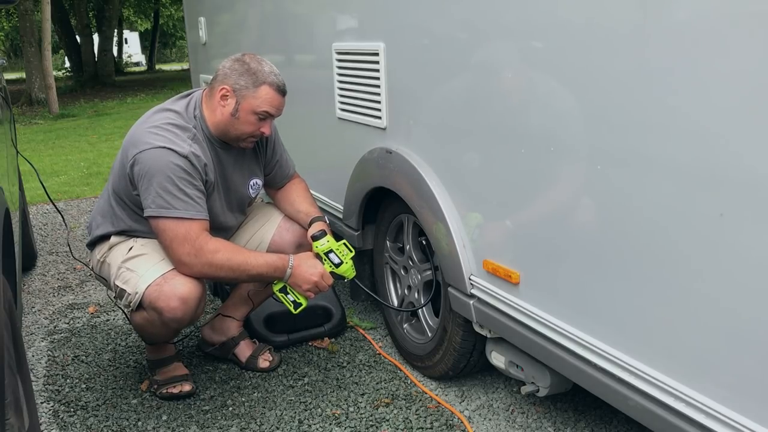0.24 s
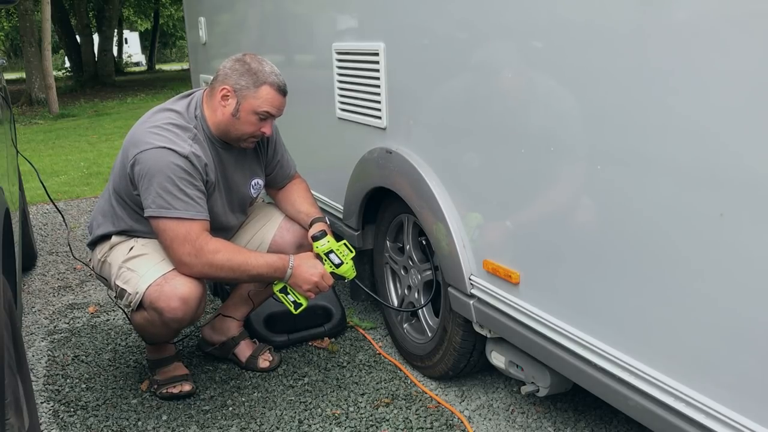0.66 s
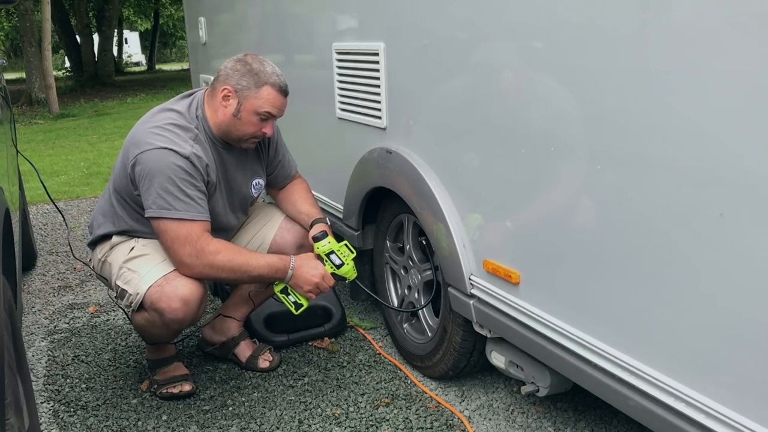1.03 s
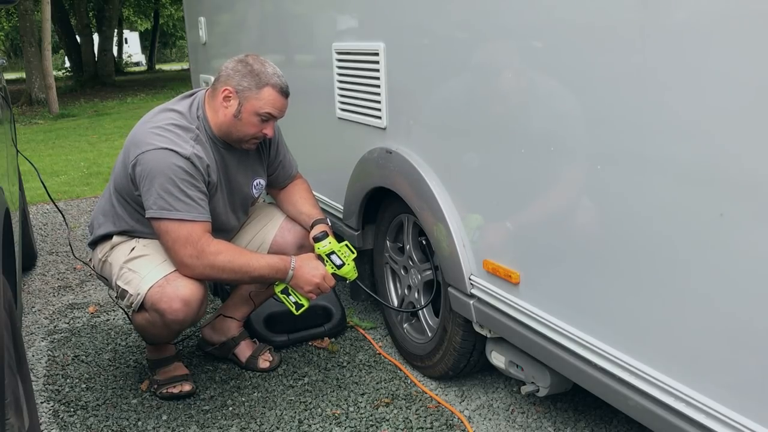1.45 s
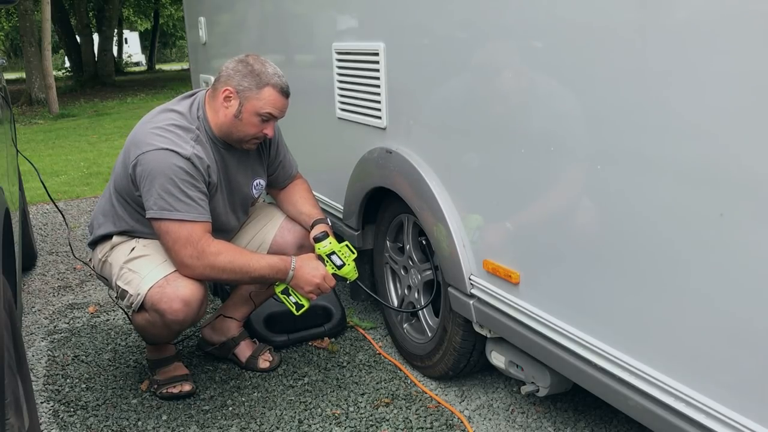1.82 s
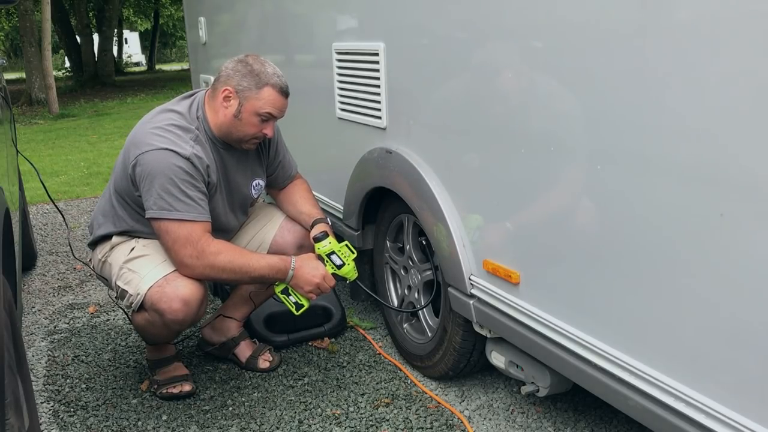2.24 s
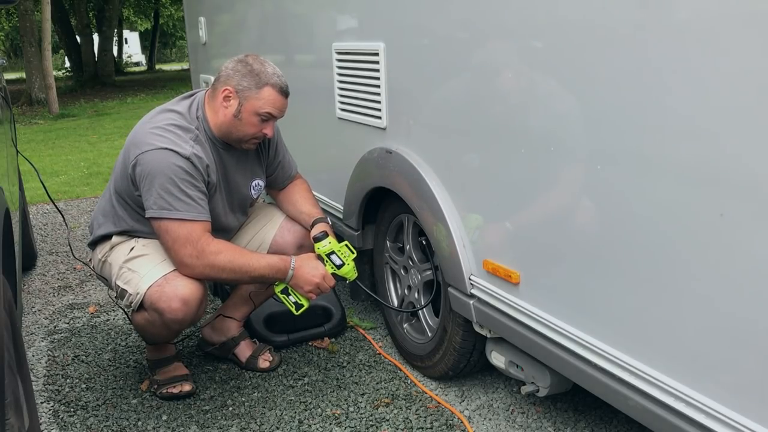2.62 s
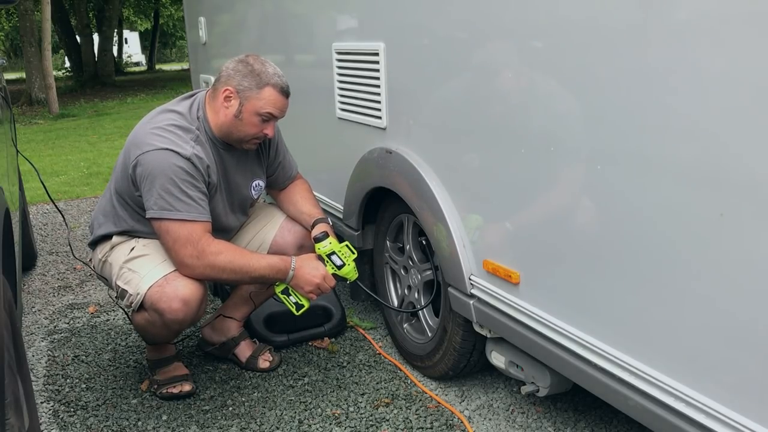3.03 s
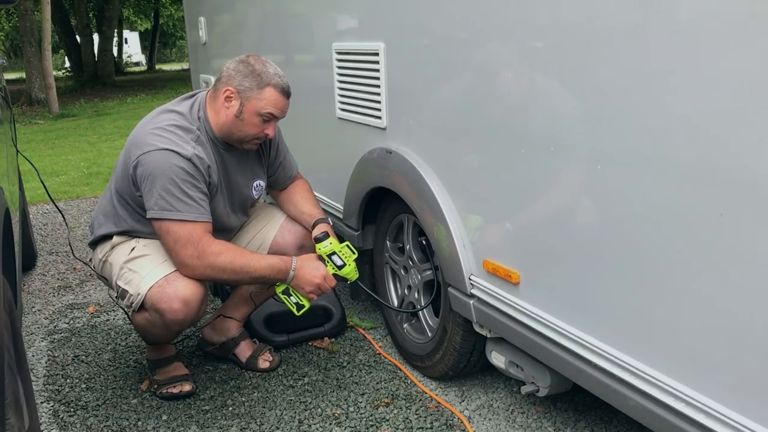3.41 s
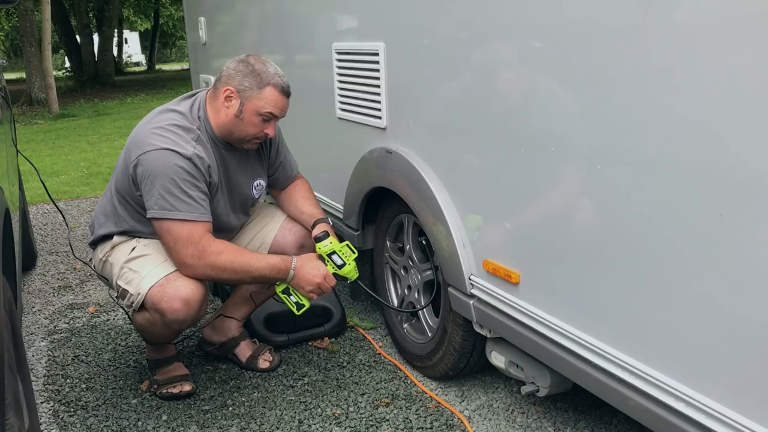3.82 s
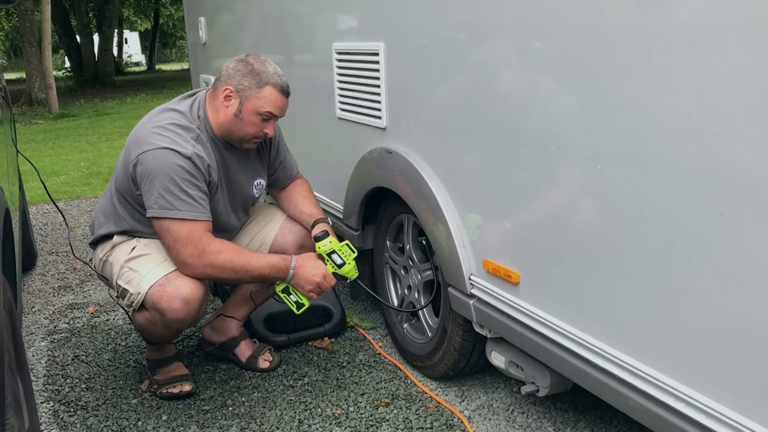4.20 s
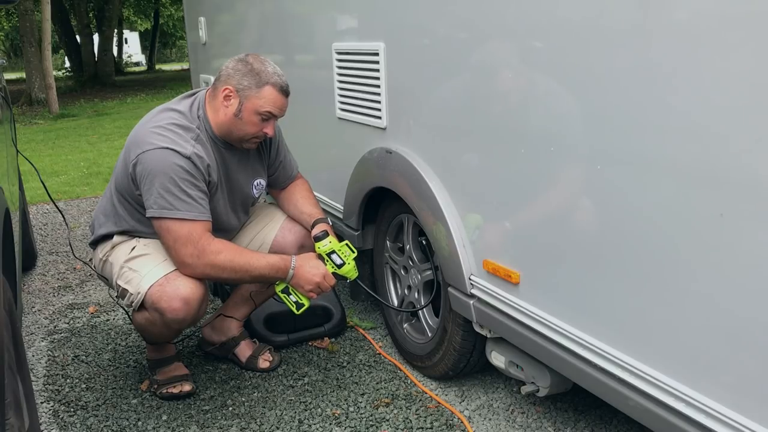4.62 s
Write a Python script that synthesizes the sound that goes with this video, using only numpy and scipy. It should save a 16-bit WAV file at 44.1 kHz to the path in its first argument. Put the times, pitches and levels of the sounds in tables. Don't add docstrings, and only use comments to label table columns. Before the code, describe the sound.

A small handheld air compressor drones steadily close to the microphone, a harsh buzzing rattle with a whining gear tone, outdoors.

```python
import sys
import numpy as np
from scipy import signal
from scipy.fft import rfft, irfft, next_fast_len
from scipy.io import wavfile
from scipy.ndimage import map_coordinates

SR = 44100
rng = np.random.default_rng(int(sys.argv[2]) if len(sys.argv) > 2 else 0)


def how_loud(loudness_db):
    steps = np.asarray(loudness_db, float) / 20
    return 10 ** steps


def unload_wav(signal):
    wavfile.write(
        sys.argv[1],
        SR,
        np.round(np.clip(np.atleast_2d(signal).T, -1, 1) * 32767).astype(np.int16),
    )


N = 209739

# t/s, speed/(turns per s)
CRANK_SPEED = [(0.0, 39.78), (0.38, 40.018), (0.52, 39.79), (0.93, 39.796), (1.15, 39.418), (1.19, 39.454),
               (1.28, 39.928), (2.35, 39.508), (2.55, 39.611), (3.2, 39.376), (3.4, 39.453), (3.68, 39.089),
               (3.91, 39.496), (4.27, 39.463), (4.35, 39.1), (4.39, 39.518), (4.47, 39.789),
               (4.756, 39.832)]
# t/s, gear load/dB, handle mode/dB (falls as the grip tightens), turn of the tool/(-1 to 1)
SLOW_DRIFT = [
    (0, -3.5, 5, 0.61),
    (.6, -2.5, 2.5, 0.43),
    (1.2, -1.5, 1.5, 0.2),
    (1.8, -0.5, -0.5, 0.037),
    (2.5, -0.5, 0.5, -.05),
    (3.2, 0, -2, -0.2),
    (4, .5, 0, -0.2),
    (4.76, 1, -3.5, -0.18),
]
# f/Hz, level/dB per Hz
OUTDOORS = [(22, 2), (50, 9.5), (90, -1), (150, 0), (280, -7.5), (600, 0), (1200, -5), (1800, -19)]
# f/Hz, level/dB per Hz
HISS = [(1000, -32), (1280, -1), (1890, -8), (2120, -21), (2610, -3), (5000, -7.5), (12000, -19),
        (14200, -34)]
# f/Hz, share/(0 to 1)
FRESH_SHARE = [(1400, 1), (1600, .35), (2130, .6), (2400, .25), (6000, .4), (10000, .4), (13000, .8),
               (14200, .92)]
# f/Hz, width/Hz, level/dB, loudest/turn, swell/dB, sharpness/1
HOUSING = [(478, 160, -77, 0.22, -26.5, 1.7), (944, 310, -46.5, 0.13, 5, 1.8),
           (1227, 310, -58.5, 0.58, 7.5, 5.8), (1627, 31, -45.5, 0.061, -1, 2),
           (1803, 270, -50, 0.81, 5.5, 1.7), (2146, 250, -45, 0.9, 7, 3), (2420, 100, -45.5, 0.36, -2, 10),
           (2764, 170, -53, 0.13, -2, 2.4), (2951, 82, -54, 0.69, 15, 2), (3470, 370, -51.5, 0.1, 10, 5.2),
           (3768, 310, -51.5, 0.748, 14, 2.3), (4002, 49, -53.5, 0.69, 12, 2.2),
           (4200, 230, -46.5, 0.53, -0.5, 0.88),
           (4640, 70, -47, 0.48, -21, 6), (4890, 160, -52.5, 0.013, 10, 4.1),
            (5270, 320, -53.5, 0.76, 10, 1.7), (5797, 100, -53.5, 0.014, 3, 2.4),
            (6630, 150, -66, 0.59, 7, 1.7), (7420, 960, -56.5, 0.13, -3, 1.4),
            (8630, 500, -59.5, 0.36, 9.5, 1.2), (9680, 420, -55.5, 0.31, 12, 0.81),
            (10390, 330, -65, 0.45, 17.5, 1.1), (11500, 970, -57.5, 0.24, 9, 1.1),
            (13020, 990, -56, 0.35, 9.5, 0.87), (14200, 1500, -72, .97, 4, 3),
            (15300, 1100, -63, .56, 0, 3)]
# f/Hz, half width/Hz, direction/1
FACING = [
    (3370, 190, 1),
    (3900, 130, -1.2),
    (6100, 180, 0.97),
]
# f/Hz, width/Hz, level/dB, moment/turn, swing with pinion position/dB, strongest/(turn of 5.5)
KNOCKS = [(5970, 180, -45, .735, 3, 4.5), (3753, 380, -47, .83, 0, -7.5), (4822, 210, -47, 0.877, 4, 2.5),
          (2925, 180, -45.5, .93, 6.5, 4.5), (3540, 420, -44.5, 0.02, 15, 5),
          (2397, 170, -42, 0.0571, 5, 1), (4710, 100, -44.5, .57, -4, 1.5), (1620, 210, -48, 1, 9.5, 0)]
# crank order/1, level/dB rms, crest/turn
THRUST = [
    (1, -46, -0.01),
    (2, -46, -0.082),
    (3, -46.5, -0.022),
    (5, -46.5, 0.011),
]
# f/Hz, width/Hz, level/dB, moment/turn
PASSAGES = [(274, 67, -47.8, 0.7237), (366, 132, -47.1, 0.9897), (463, 147, -37.5, 0.1641),
            (519, 54, -46.3, 0.451), (617, 85, -52.3, 0.9555), (705, 90, -35.0, 0.8798),
            (760, 229, -47.5, 0.8511), (850, 300, -38.2, 0.0927), (895, 231, -50.1, 0.5805),
            (952, 107, -34.4, 0.1119), (1000, 125, -50.7, 0.6385), (1157, 48, -46.1, 0.7476),
            (1290, 102, -39.3, 0.9959), (1377, 45, -50.5, 0.0111)]

GEAR = 53 / 11
GRAIN = 1100
START_TURN = -.013
RIPPLE_TURN = .0086
PINION_CYCLE = 5.5


def unit(x):
    return x / np.sqrt(np.mean(x ** 2) + 1e-20)


def along(points, hz):
    f, value = np.transpose(points)
    return np.interp(np.log(hz + 1), np.log(f + 1), value)


def filtered(x, response):
    m = next_fast_len(N + 4096)
    return irfft(rfft(x, m) * response(np.fft.rfftfreq(m, 1 / SR)), m)[:N]


def ring(f, hz, width):
    return (1j * f * width / (hz * hz - f * f + 1j * f * width)) ** 2


def wobble(rate):
    knots = rng.standard_normal(int(N * rate / SR) + 4)
    return map_coordinates(knots, [np.arange(N) * rate / SR])


def swell(turn, centre, db, sharp):
    return how_loud(db * np.exp(sharp * (np.cos(2 * np.pi * (turn - centre)) - 1)))


def crank():
    t, speed = np.transpose(CRANK_SPEED)
    return START_TURN + np.cumsum(np.interp(np.arange(N) / SR, t, speed)) / SR


def open_air():
    far = filtered(rng.standard_normal(N), lambda hz: how_loud(along(OUTDOORS, hz)))
    return how_loud(-44 + 0.39 * wobble(3)) * unit(far)


def hiss(turn):
    pattern = rng.standard_normal(11 * GRAIN)
    repeated = pattern[(turn * GRAIN).astype(int) % (11 * GRAIN)]
    locked = filtered(repeated, lambda hz: how_loud(along(HISS, hz)) * np.sqrt(1 - along(FRESH_SHARE, hz)))
    new = rng.standard_normal(N)
    loose = filtered(new, lambda hz: how_loud(along(HISS, hz)) * np.sqrt(along(FRESH_SHARE, hz)))
    return how_loud(-39) * unit(locked + loose) * swell(turn, 0.23, db=5.5, sharp=1.5)


def rattle(turn, geared):
    spot = (geared * GRAIN).astype(int)
    wheel = rng.standard_normal(GRAIN)[spot % GRAIN]
    pair = rng.standard_normal(11 * GRAIN)[spot % (11 * GRAIN)]
    pinion = 2 * np.pi * GEAR * geared
    contact = 1 + 0.64 * np.cos(pinion + .05) + 0.19 * np.cos(2 * pinion + .05)
    worn = unit(wheel * contact + 0.37 * pair)
    new = rng.standard_normal(N)
    m = next_fast_len(N + 4096)
    f, total = np.fft.rfftfreq(m, 1 / SR), 0
    for k, (hz, width, db, centre, swell_db, sharp) in enumerate(HOUSING):
        share = np.clip(along(FRESH_SHARE, hz), 0, 1)
        shake = np.sqrt(1 - share) * worn + np.sqrt(share) * new
        shake = shake * swell(turn, centre, swell_db, sharp)
        gain = how_loud(db) * np.sqrt(SR / width) * (-1) ** k
        total = total + gain * ring(f, hz, width) * rfft(shake, m)
    return irfft(total, m)[:N]


def knocks(turn):
    count = np.arange(-1, int(turn[-1]) + 1)
    total = 0
    for hz, width, db, at, swing_db, best in KNOCKS:
        chance = rng.standard_normal((len(count), 2))
        where = np.searchsorted(turn, count + at + .0005 * chance[:, 0])
        swing = swing_db * np.cos(2 * np.pi * (count - best) / PINION_CYCLE)
        size = how_loud(swing + chance[:, 1])
        blows = np.bincount(where, size * (where > 0), N + 1)[:N]
        total = total + how_loud(db) * unit(filtered(blows, lambda f: ring(f, hz, width)))
    return total


def mesh(turn, geared):
    tone = np.cos(2 * np.pi * 53 * geared) * swell(turn, .8, db=18, sharp=2.5)

    def shell(hz):
        tilt = how_loud((hz - 2100) / 24)
        band = (abs(hz - 2100) < 400) / (1 + ((hz - 2095) / 128) ** 8)
        lag = np.exp(-2j * np.pi * hz * .001)
        return tilt * band * lag

    return how_loud(-31.5) * unit(filtered(tone, shell))


def gripped(x, grip_db, lean):
    def band(f, hz, width):
        return 1 / (1 + ((f - hz) / width) ** 4)

    handle = filtered(x, lambda f: band(f, 1600, 120))
    aimed = filtered(x, lambda f: sum(way * band(f, hz, width) for hz, width, way in FACING))
    return x + (how_loud(grip_db) - 1) * handle + lean * aimed


def motor(turn, geared):
    slots = np.cos(2 * np.pi * (5 * GEAR * geared + .175))
    slots = slots * (1 - .3 * np.cos(2 * np.pi * turn))
    shaft = np.cos(2 * np.pi * GEAR * geared)

    def radiation(hz):
        bump = 1 + .3 * np.exp(-((hz - 995) / 25) ** 2)
        return bump / (1 + (hz / 1016) ** 80)

    return how_loud(-32.5) * filtered(slots, radiation) + how_loud(-67) * shaft


def rung_passages(rows, angle):
    order = np.arange(1, 40)
    nominal = 39.6
    spectrum = 0
    for hz, width, db, at in rows:
        moment = np.exp(-2j * np.pi * order * at)
        spectrum = spectrum + how_loud(db) * ring(order * nominal, hz, width) * moment
    return np.real(spectrum @ np.exp(2j * np.pi * order[:, None] * angle))


def piston(turn):
    angle = np.arange(4096) / 4096
    outlet_hz = 650
    thrust = sum(how_loud(db) * np.cos(2 * np.pi * k * (angle - at)) for k, db, at in THRUST)
    inlet_wave = thrust + rung_passages([v for v in PASSAGES if v[0] < outlet_hz], angle)
    outlet_wave = rung_passages([v for v in PASSAGES if v[0] >= outlet_hz], angle)
    now = turn + 0.00025 * wobble(29.6)
    late = .0007 * np.cos(2 * np.pi * (turn - .2) / PINION_CYCLE)
    inlet = np.interp(now, angle, inlet_wave, period=1)
    outlet = np.interp(now - late, angle, outlet_wave, period=1)
    rocking = 1 + 0.067 * np.cos(2 * np.pi * GEAR * turn)
    return np.sqrt(2) * (inlet + outlet) * how_loud(0.26 * wobble(24.75)) * rocking


def scene():
    turn = crank()
    geared = turn - RIPPLE_TURN * np.sin(2 * np.pi * turn)
    t, *controls = np.transpose(SLOW_DRIFT)
    load_db, grip_db, lean = (np.interp(np.arange(N) / SR, t, c) for c in controls)
    gear = how_loud(load_db) * (mesh(turn, geared) + knocks(turn)) + rattle(turn, geared)
    drive = piston(turn) + motor(turn, geared)
    mix = drive + gripped(gear, grip_db, lean) + hiss(turn) + open_air()
    return mix[None]


def band_limit(x):
    return signal.sosfilt(signal.butter(12, 15720, fs=SR, output="sos"), x)


def record(dry):
    return band_limit(dry)


dry = scene()
out = record(dry)
unload_wav(out)
```